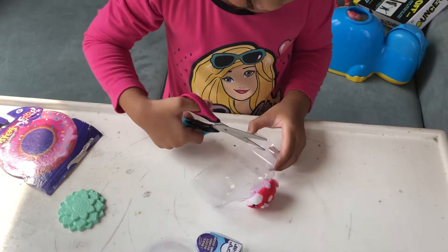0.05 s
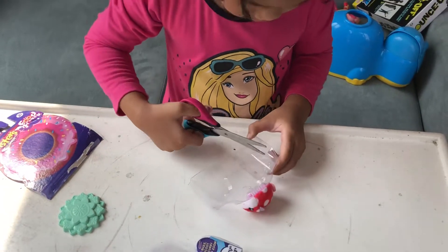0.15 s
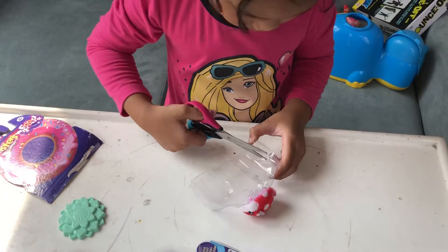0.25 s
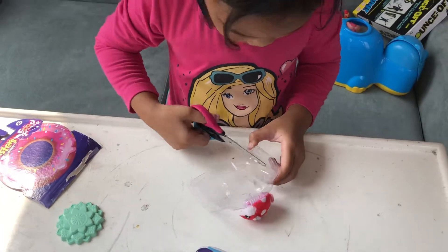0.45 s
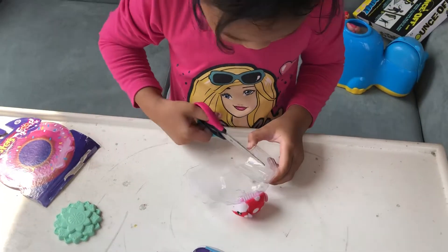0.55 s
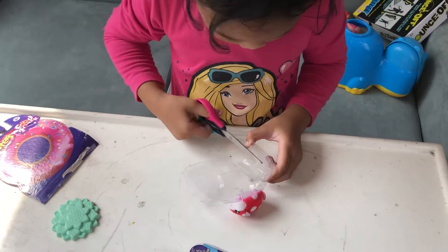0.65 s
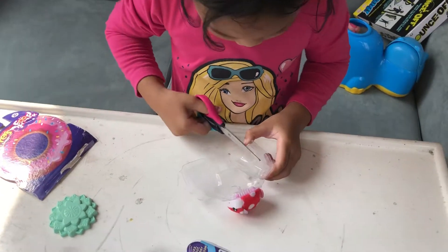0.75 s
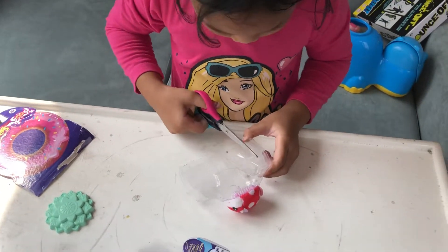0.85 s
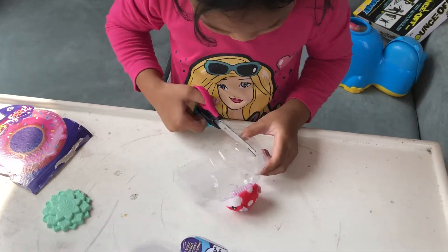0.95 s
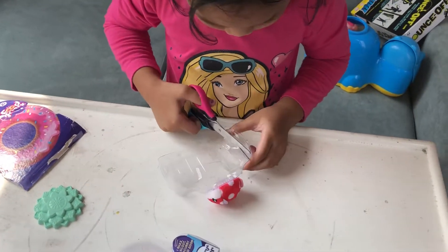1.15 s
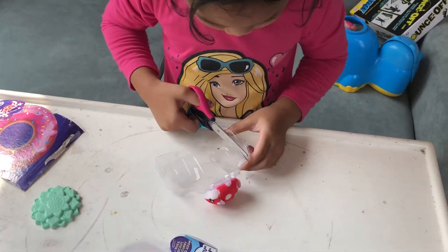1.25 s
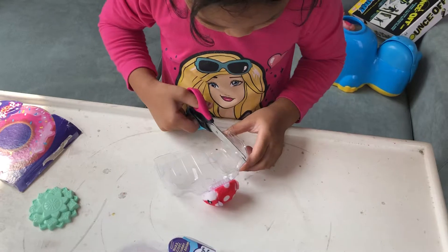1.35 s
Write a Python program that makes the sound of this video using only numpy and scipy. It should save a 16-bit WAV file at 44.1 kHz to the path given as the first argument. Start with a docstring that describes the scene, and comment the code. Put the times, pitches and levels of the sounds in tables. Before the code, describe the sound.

Small scissors snip through stiff clear plastic, a short rasp then a sharp double snap and crackles

```python
"""Small scissors cut a stiff clear plastic pack, close up, over a table in a quiet, fairly live room.
Single stick-slip ticks run into a short rasp, then the plastic gives with a double snap: sharp clicks with flutter.
The pack crackles in clusters of tiny cracks and buckles with hollow, damped knocks as it is shifted in the hand.
Soft low table modes sound the bumps; behind them lie filtered room noise, a wavering hum and a fading ring."""
import sys
import numpy as np
from scipy import signal
from scipy.fft import rfft, irfft, next_fast_len
from scipy.io import wavfile

SR = 44100
rng = np.random.default_rng(int(sys.argv[2]) if len(sys.argv) > 2 else 0)


def materialize(psi):
    """Save the field psi as 16-bit PCM at rate SR to the path in sys.argv[1].

    A 1-D psi becomes a single channel; in a 2-D psi each row is a channel.
    """
    bounded = np.clip(np.atleast_2d(psi).T, -1, 1)
    quanta = np.round(bounded * 32767).astype(np.int16)
    wavfile.write(sys.argv[1], SR, quanta)


N = 61739  # length in samples, 1.4 s

# Levels of the events are relative: each source adds its own fixed gain.
# Room noise behind everything. Each row: frequency in Hz, relative level in dB.
FLOOR_COLOUR = [(15, -53), (25, -45), (53, -8), (108, -18.5), (130, -5), (301, -5), (326, -2.5), (354, -2),
                (476, -10.5), (962, -11), (1400, -16), (1740, -19.5), (1890, -22), (2690, -26),
                (16000, -49.5)]
# Low hum of the room. Each row: centre in Hz, level in dB.
HUM_BANDS = [(143, -67), (209, -61.5), (364, -59)]
# Colour of the room still ringing from earlier handling. Each row: frequency in Hz, relative level in dB.
EARLIER_RING_COLOUR = [(150, -8), (370, 2), (700, -4), (1500, -3), (3000, -10), (5500, -10), (9000, -22),
                       (15000, -32)]
# Reverberation of the room. Each row: frequency in Hz, time to fall 60 dB in seconds.
ROOM_DECAY = [(200, 0.48), (1000, 0.49), (3000, .49), (7000, 0.46), (15000, 0.22)]

# Hands bump the table. Each row: start in seconds, relative level in dB.
TABLE_BUMPS = [(0.97, -43.5), (.990, -46), (1.114, -44), (1.189, -43), (1.297, -43.5), (1.38, -48.5)]
# Modes of the table top. Each row: frequency in Hz, relative level in dB, time to fall 60 dB in seconds.
TABLE_MODES = [(59.3, -0.5, 0.13), (79.5, -3, 0.094), (149, -33, 0.048), (250, -9.5, 0.23)]

# The shell buckles with a hollow knock. Each row: start in seconds, relative level in dB, pitch in Hz.
SHELL_BUCKLES = [(.501, -17.5, 1266), (0.5212, -19.5, 1010), (1.016, -45, 1075), (1.0298, -19.5, 1115),
                 (1.042, -28.5, 1060), (1.0902, -34, 1050), (1.096, -28, 1556), (1.137, -22, 1093),
                 (1.157, -29.5, 1550)]
# Modes of the shell. Each row: multiple of the pitch, relative level in dB, time to fall 60 dB in seconds.
SHELL_MODES = [(.28, -11.5, 0.0093), (.5, -10, 0.0063), (.88, -24.5, 0.0024), (1, 2, 0.0084),
               (1.35, -15.5, 0.0085), (1.7, -21.5, 0.0066), (2.15, -17.5, 0.0046)]
# The room's answer to the buckles. Each row: frequency in Hz, gain in dB.
BUCKLE_ROOM = [(250, -5), (1000, -2), (2500, 3)]

# Crackles of the pack. Each row: start in seconds, relative level in dB, length in seconds,
# treble tilt in dB per octave above 1 kHz, ring of the crease in Hz.
PACK_CRACKLES = [(.008, -34, 0.0047, -3, 5600), (0.177, -33, 0.0031, 1.5, 3380),
                 (0.2056, -34, .002, -7.5, 3500), (0.221, -21, 0.0029, -5, 2600),
                 (0.519, -34, 0.0025, -5, 5000), (0.532, -16.5, .012, 16, 2300),
                 (.542, -19, 0.0071, 10, 4250), (0.558, -19.5, 0.0022, 5, 3200),
                 (0.6603, -30, .003, -1.5, 5460), (.6772, -22, 0.0037, 1.5, 2820),
                 (0.68, -16.5, 0.0025, 3, 5750), (0.931, -35.5, 0.0024, 3.5, 3560),
                 (0.9657, -32.5, 0.01, -5, 7500), (0.9852, -16.5, 0.0013, 1, 8500),
                 (0.9883, -14, 0.0081, -1, 5200), (0.996, -29, 0.002, -21, 2100),
                 (1.0109, -15.5, 0.0062, -0.5, 8260), (1.018, -19, 0.0034, -3.5, 8000),
                 (1.032, -19.5, 0.018, 2, 2450), (1.0533, -19.5, 0.0017, 0.5, 3120),
                 (1.0937, -15.5, 0.0049, -3, 1670), (1.113, -37, .003, 8, 7000),
                 (1.1342, -27, .003, -6, 1320), (1.142, -28.5, 0.0056, 4.5, 2220),
                 (1.24, -34, 0.0082, 2, 9450), (1.2566, -29.5, .005, 4, 5370),
                 (1.2835, -23, 0.0023, -0.5, 2870), (1.3377, -32, 0.0035, -2, 2530),
                 (1.344, -35.5, 0.0043, -10, 2900), (1.366, -33.5, 0.0091, 0, 3730)]
# Colour of one tiny crack. Each row: frequency in Hz, relative level in dB.
CRACK_COLOUR = [(200, -17), (700, -10), (1500, -2.5), (2600, 1.5), (4000, -3), (5800, -2.5), (8300, -5.5),
                (11000, -7.5), (15500, -14.5)]
# The room's answer to the crackles. Each row: frequency in Hz, gain in dB.
CRACKLE_ROOM = [(400, 9.5), (1800, 2.5), (4000, -2), (9000, -6), (15000, -5)]

# The plastic breaks. Each row: start in seconds, relative level in dB.
PLASTIC_SNAPS = [(0.4965, -5), (0.4995, 0.5)]
# Colour of a break. Each row: frequency in Hz, relative level in dB.
BREAK_COLOUR = [(150, -52), (500, -10), (1000, -14.5), (1700, -4.5), (2400, 3), (3400, -3), (4800, 6),
                (6800, -6), (8400, -5.5), (11000, -15), (15500, -20)]
# The room's answer to the breaks. Each row: frequency in Hz, gain in dB.
BREAK_ROOM = [(150, -16), (400, 13.5), (1300, 9), (2500, -3), (4800, -7), (8000, -6.5), (15000, -7)]

# First separate bites of the blades. Each row: start in seconds, relative level in dB.
BLADE_BITES = [(.2222, -23), (.2317, -18), (.236, -16), (.2509, -11), (.2551, -12), (.2596, -15)]
# The running cut. Each row: time in seconds, slips per second.
CUT_RATE = [(.2683, 300), (.277, 445), (.284, 280), (.291, 283), (.297, 405), (.302, 260), (.311, 200),
            (.315, 300), (.322, 310), (.326, 365), (.333, 270), (.348, 292)]
# Colour of a slip halfway through the cut. Each row: frequency in Hz, relative level in dB.
TICK_COLOUR = [(200, -51), (600, -40), (1200, -20.5), (2300, -15.5), (3300, -3), (4550, 0), (5600, -5.5),
               (6700, -11.5), (8700, -8), (11000, -12), (15500, -14)]
# The room's answer to the cutting. Each row: frequency in Hz, gain in dB.
CUT_ROOM = [(400, 0), (1200, 5), (2500, -6), (4500, -10.5), (9000, -6.5), (15000, -5.5)]

FLOOR_DB = -50.5
EARLIER_RING_DB, EARLIER_RING_T60_S = -48.5, 0.24  # level at the start, and its decay
TABLE_ECHO_S, TABLE_ECHO_DB = .00097, -9  # bounce off the table: delay, and level against the direct sound
LOW_CUT_HZ, TOP_HZ = 41, 16000  # the recorder's band

BUMP_SCATTER_DB = 1.5
CLUSTER_SCATTER_DB = 4  # uneven strength of the cracks in one crackle
CREASE_GAIN, CREASE_Q = 2.2, 5
CREASE_ROOM_SHARE = .25  # part of the crease's ring that reaches the room
DISPERSION_HZ, DISPERSION_SHARE = 3760, 0.76  # bending waves near this pitch arrive late; pole radius
SNAP_FLUTTER_DB, SNAP_FLUTTER_T60_S = -3.5, .009

CUT_DB = -11.5  # relative level of each slip in the running cut
SLIP_SCATTER_S, SLIP_SCATTER_DB = .00006, .7
SLIP_FLUTTER_DB, SLIP_FLUTTER_T60_S = -9, .005
SLIP_RISE_OCT_PER_S = 1.4  # the tick's resonance climbs as the blades close
BRIGHTEN_DB_PER_S = 17  # treble tilt per octave grows as the blades close
TIP_START_S = .338  # slips after this also ring near the blade tips
TIP_HZ, TIP_T60_S, TIP_DB, TIP_SCATTER_DB = 8740, 0.0089, -4, 1


def amp(db):
    """Amplitude of a level in dB."""
    return 10 ** (np.asarray(db) / 20)


def unit(x):
    """x scaled to an RMS of one."""
    return x / np.sqrt(np.mean(x ** 2) + 1e-20)


def along(points, hz):
    """Values between (Hz, value) points on a log frequency axis."""
    f, v = np.transpose(points)
    return np.interp(np.log(hz + 1), np.log(f + 1), v)


def filtered(x, response):
    """x with its spectrum multiplied by a response of frequency."""
    m = next_fast_len(N + SR // 2)
    spectrum = rfft(x, m) * response(np.fft.rfftfreq(m, 1 / SR))
    return irfft(spectrum, m)[:N]


def add(out, s, x):
    """Mix x into out at time s."""
    i = int(np.clip(round(s * SR), 0, N - 1))
    out[i:i + len(x)] += x[:N - i]


def click(colour, tilt_db=0, size=1024):
    """A causal, minimum-phase click of unit energy with the given colour."""
    hz = np.fft.rfftfreq(size, 1 / SR)
    tilt = tilt_db * np.log2(np.maximum(hz, 1000) / 1000)
    cepstrum = irfft(np.log(amp(along(colour, hz) + tilt)))
    # folding the cepstrum forward puts the energy at the onset
    cepstrum[1:size // 2] *= 2
    cepstrum[size // 2 + 1:] = 0
    h = irfft(np.exp(rfft(cepstrum)))
    return h / np.linalg.norm(h)


def ring(modes, attack_s, scatter_db):
    """Damped modes of one blow, each a decaying sine of slightly random level."""
    t = np.arange(SR // 4) / SR
    out = np.zeros(len(t))
    for hz, db, t60 in modes:
        decay = amp(db + scatter_db * rng.normal() - 60 * t / t60)
        out += decay * np.sin(2 * np.pi * hz * t)
    return (1 - np.exp(-t / attack_s)) * out


def fracture(colour, flutter_db, flutter_t60, tilt_db=0):
    """One sharp release and the brief flutter after it, spread as they travel through the sheet."""
    t = np.arange(SR // 50) / SR
    push = rng.standard_normal(len(t)) * amp(-60 * t / flutter_t60) * np.sqrt(t)
    push *= amp(flutter_db) / np.linalg.norm(push)
    push[0] = 1  # the release itself
    r = DISPERSION_SHARE
    allpass = np.array([1, -2 * r * np.cos(2 * np.pi * DISPERSION_HZ / SR), r * r])
    coloured = np.convolve(push, click(colour, tilt_db))
    return signal.lfilter(allpass[::-1], allpass, coloured)


def near(x):
    """The direct sound and its duller, delayed bounce off the table."""
    def response(f):
        bounce = np.exp(-2j * np.pi * f * TABLE_ECHO_S) / (1 + (f / 9000) ** 2)
        return 1 + amp(TABLE_ECHO_DB) * bounce
    return filtered(x, response)


def room(x, answer, build_s):
    """The room's tail: noise that builds up, then decays at its own rate in each band, coloured by answer."""
    hz, t, bands = signal.stft(rng.standard_normal(SR * 3 // 4), SR, nperseg=256)
    decay = amp(-60 * t / along(ROOM_DECAY, hz)[:, None])
    tail = signal.istft(bands * decay, SR, nperseg=256)[1]
    tail *= 1 - np.exp(-(np.arange(len(tail)) / SR / build_s) ** 2)
    wet = signal.fftconvolve(x, tail / np.linalg.norm(tail))[:N]
    return filtered(wet, lambda f: amp(along(answer, f)))


def room_tone():
    """Dull room noise, narrow noise bands as a wavering low hum, and the fading ring of earlier handling."""
    def noise(colour):
        return unit(filtered(rng.standard_normal(N), lambda f: amp(along(colour, f))))

    def drone(hz, width_hz):
        return unit(filtered(rng.standard_normal(N), lambda f: 1 / (1 + ((f - hz) / width_hz) ** 2)))

    floor = amp(FLOOR_DB) * noise(FLOOR_COLOUR)
    hum = sum(amp(db) * drone(hz, width_hz=10.1) for hz, db in HUM_BANDS)
    fade = amp(EARLIER_RING_DB - 60 * np.arange(N) / SR / EARLIER_RING_T60_S)
    return floor + hum + fade * noise(EARLIER_RING_COLOUR)


def bumping():
    """Soft, low thuds: each bump sets off the damped modes of the table top."""
    out = np.zeros(N)
    for s, db in TABLE_BUMPS:
        add(out, s, amp(db + 5.5) * ring(TABLE_MODES, attack_s=0.0055, scatter_db=BUMP_SCATTER_DB))
    return out


def buckling():
    """The hollow shell pops in and out, its pitch set by where it gives."""
    out = np.zeros(N)
    for s, db, hz in SHELL_BUCKLES:
        modes = [(hz * k, level, t60) for k, level, t60 in SHELL_MODES]
        add(out, s, amp(db - 3) * ring(modes, attack_s=0.00024, scatter_db=7.5))
    radiated = signal.lfilter(*signal.butter(2, 220, "high", fs=SR), out)
    return near(radiated) + room(radiated, BUCKLE_ROOM, build_s=0.0063)


def crackling():
    """Each crease lets go in a dying cluster of tiny cracks that ring its patch; the room blends them into one."""
    direct, radiated = np.zeros(N), np.zeros(N)
    t = np.arange(SR // 20) / SR
    for s, db, length, tilt, hz in PACK_CRACKLES:
        cluster = rng.standard_normal(len(t)) * np.exp(-(t / length) ** 2)
        cluster *= amp(CLUSTER_SCATTER_DB * rng.standard_normal(len(t)))
        crack = click(CRACK_COLOUR, tilt)
        tone = CREASE_GAIN * signal.lfilter(*signal.iirpeak(hz, CREASE_Q, SR), crack)
        burst = np.convolve(cluster, crack + tone)
        add(direct, s, amp(db + 9) * burst / np.linalg.norm(burst))
        blended = (crack + CREASE_ROOM_SHARE * tone) / np.linalg.norm(crack + tone)
        add(radiated, s, amp(db + 9) * blended)
    return near(direct) + room(radiated, CRACKLE_ROOM, build_s=0.0036)


def snapping():
    """The last of the edge cracks through in two steps; the room blends away the flutter."""
    direct, radiated = np.zeros(N), np.zeros(N)
    for s, db in PLASTIC_SNAPS:
        snap = fracture(BREAK_COLOUR, SNAP_FLUTTER_DB, SNAP_FLUTTER_T60_S)
        add(direct, s, amp(db + 5) * snap)
        add(radiated, s, amp(db + 3) * click(BREAK_COLOUR))
    return near(direct) + room(radiated, BREAK_ROOM, build_s=0.006)


def cutting():
    """The blades stick and slip through the sheet, each slip a like tick, higher and brighter as they close."""
    s, rate = np.transpose(CUT_RATE)
    t = np.arange(s[0], s[-1], 1 / SR)
    # one slip each time the running count of slips passes a whole number
    count = np.cumsum(np.interp(t, s, rate)) / SR
    times = np.interp(np.arange(np.ceil(count[-1])), count, t)
    chance = rng.standard_normal((len(times), 2))
    times = times + SLIP_SCATTER_S * chance[:, 0]
    levels = CUT_DB + SLIP_SCATTER_DB * chance[:, 1]
    ticks, tips = np.zeros(N), np.zeros(N)
    for at, db in list(BLADE_BITES) + list(zip(times, levels)):
        closing = at - s.mean()  # seconds from the middle of the cut
        colour = np.array(TICK_COLOUR) * [2 ** (SLIP_RISE_OCT_PER_S * closing), 1]
        tick = fracture(colour, SLIP_FLUTTER_DB, SLIP_FLUTTER_T60_S, BRIGHTEN_DB_PER_S * closing)
        add(ticks, at, amp(db + 7.5) * tick)
        if at > TIP_START_S:
            tip = ring([(TIP_HZ, 0, TIP_T60_S)], attack_s=.0002, scatter_db=TIP_SCATTER_DB)
            add(tips, at, amp(db + TIP_DB) * tip)
    return tips + near(ticks) + room(ticks, CUT_ROOM, build_s=0.0068)


def scene():
    """The room, the pack, the table and the scissors together, in one channel."""
    return (room_tone() + snapping() + crackling() + buckling() + bumping() + cutting())[None]


def record(dry):
    """The recorder drops the deepest bass and keeps nothing above its band limit."""
    def response(hz):
        return (hz < TOP_HZ) * hz ** 2 / np.hypot(hz ** 2, LOW_CUT_HZ ** 2)
    return filtered(dry[0], response)[None]


dry = scene()
out = record(dry)
materialize(out)
```